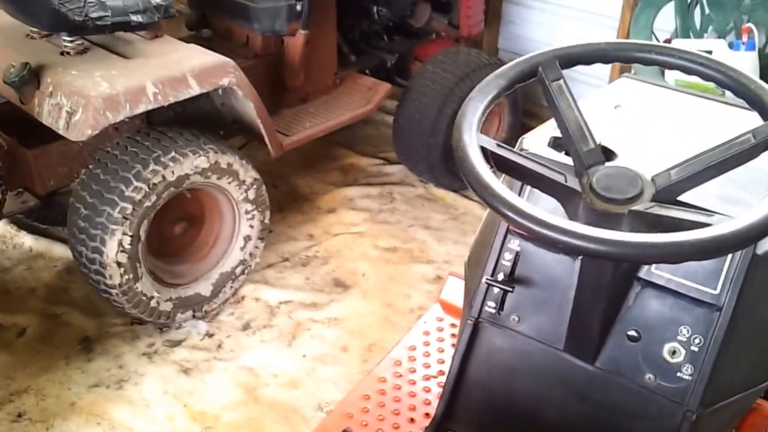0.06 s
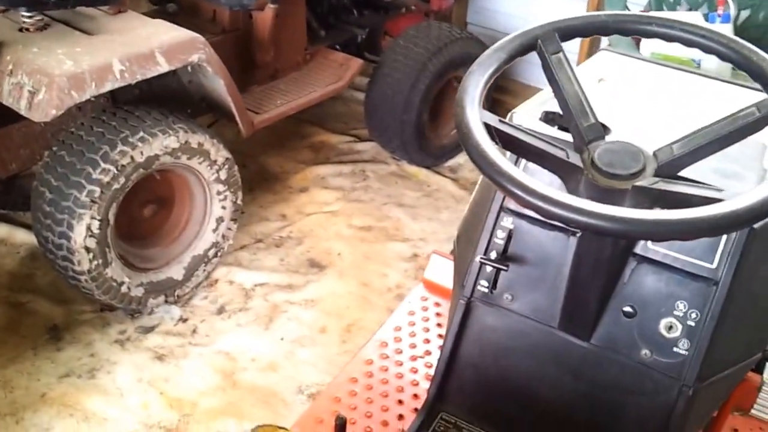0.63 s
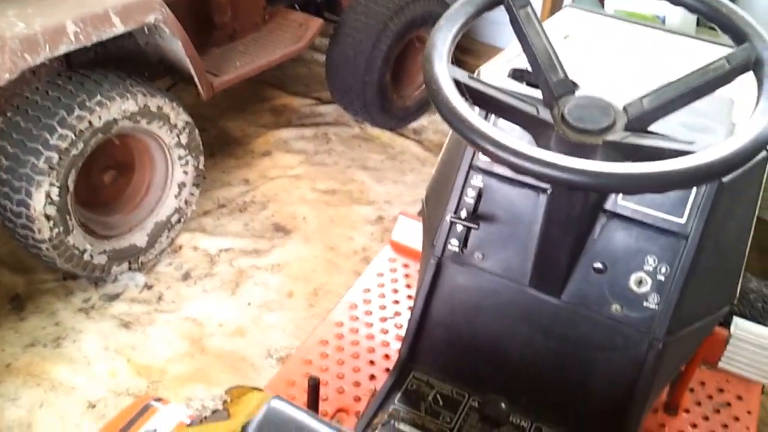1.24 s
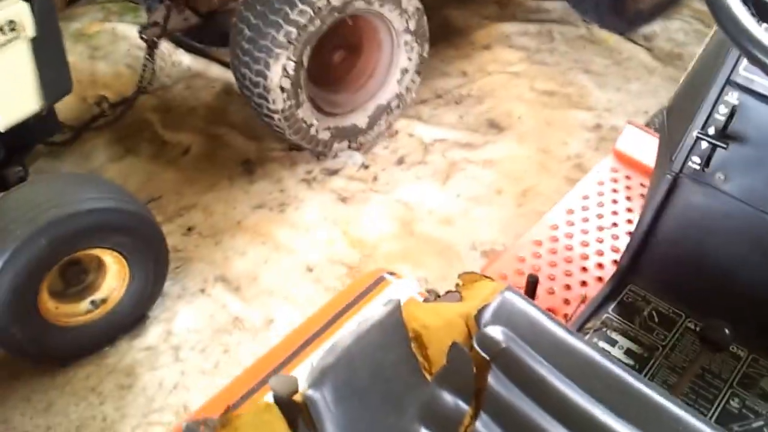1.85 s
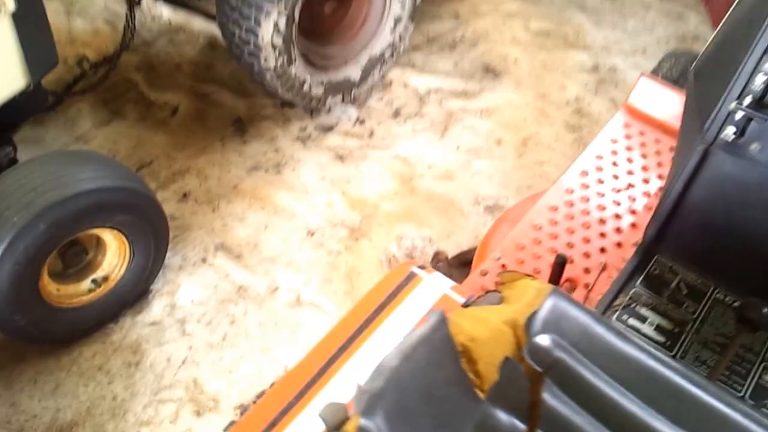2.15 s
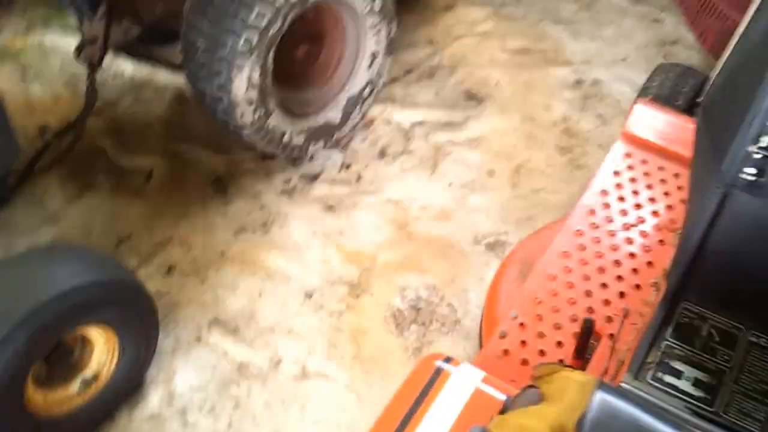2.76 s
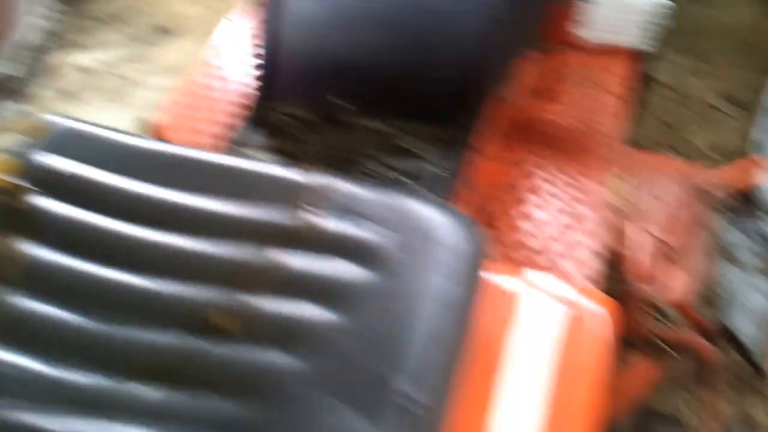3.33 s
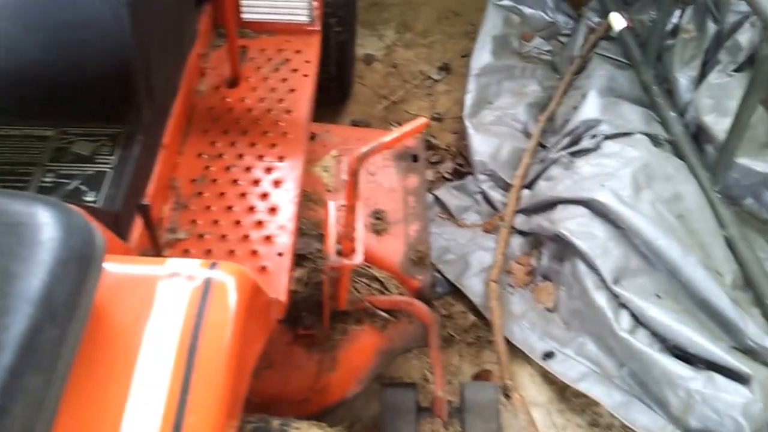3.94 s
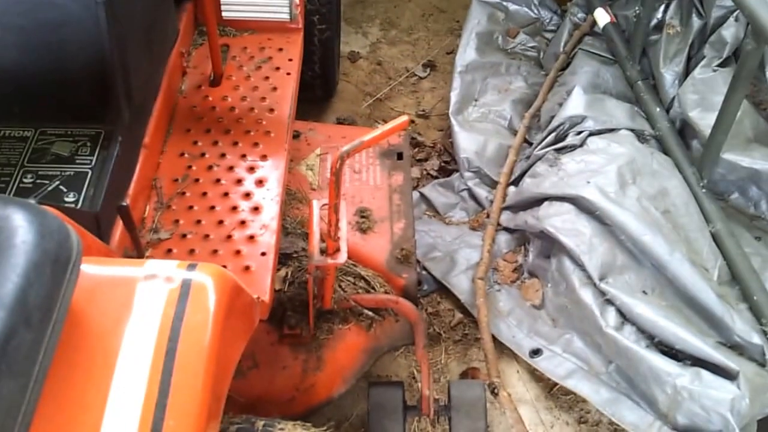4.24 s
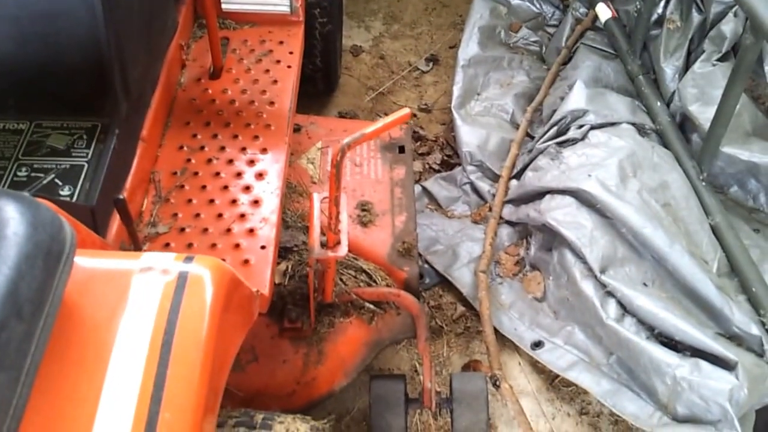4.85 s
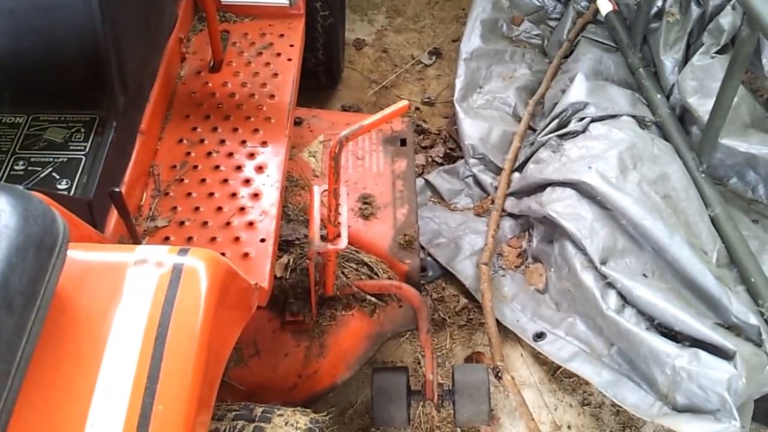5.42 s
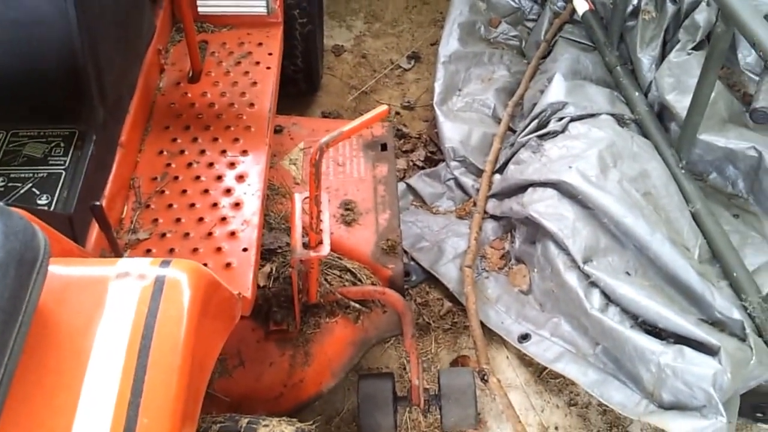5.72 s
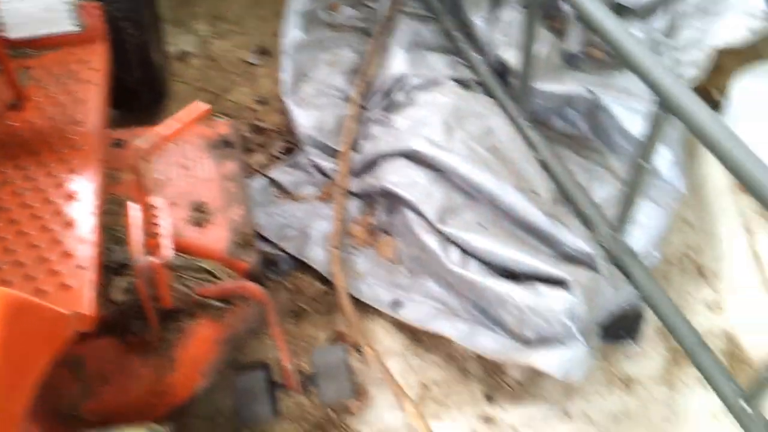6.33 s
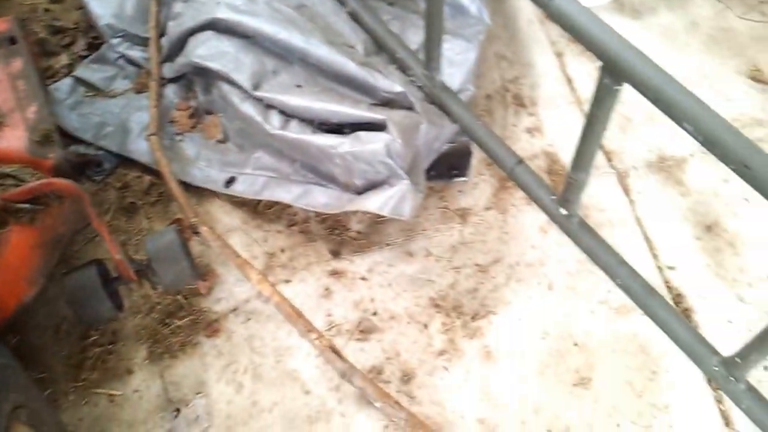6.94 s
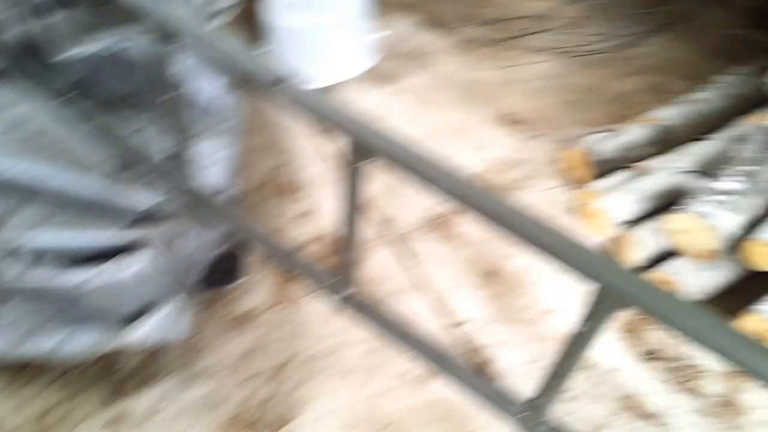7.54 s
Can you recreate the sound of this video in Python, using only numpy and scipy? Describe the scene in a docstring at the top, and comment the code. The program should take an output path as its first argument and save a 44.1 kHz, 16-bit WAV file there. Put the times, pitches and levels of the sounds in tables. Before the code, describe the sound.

Young animals, probably baby raccoons, chitter softly in a cluttered shed over a steady hiss. Each burst is a fast train of tiny, squeaky hoots with faint scuffling, heard at 0.1-0.7 seconds, 1.3, 2.6-3.4 and 4-4.9, then almost continuously and slightly louder from 6 seconds on; a weaker animal sometimes overlaps. Further off, a bird gives high, slurred, slightly echoing chirps in the first second, around 2-2.6 and 5.5-6.4, with held whistles breaking into hoarse falls near 3, 5, 6.2 and 6.9 seconds. Close finger bumps and clicks on the hand-held microphone stand out at about 1.6-1.8 and 2.9-3.1 seconds. Two sharp, bright ticks ring briefly in the shed at 5.9 and 6 seconds. Soft rustles come and go, mostly in the later part. The loudest sound is a handling thump with a click at about 7.6 seconds.

```python
"""In a cluttered shed young animals, probably raccoon kits, chitter: trains of short hoots, about 22 a
second, each a push of air whose pitch and level follow the effort. Further off a bird whistles slurred,
frequency-modulated phrases. Two sharp ticks excite the shed's reverberation, among soft rustles.
Fingers bump and click on the hand-held mono recorder, exciting its case modes, over a steady hiss."""
import sys
import numpy as np
from scipy import signal
from scipy.fft import rfft, irfft, next_fast_len
from scipy.io import wavfile

SR = 44100
rng = np.random.default_rng(int(sys.argv[2]) if len(sys.argv) > 2 else 0)


def store_pcm(level_fs):
    """Save levels as 16-bit WAV."""
    pcm = np.round(np.clip(level_fs, -1, 1) * 32767).astype(np.int16)
    wavfile.write(sys.argv[1], SR, np.atleast_2d(pcm).T)


N = 338688

# Trains of hoots, each swelling to a crest of effort and easing off: (first hoot [s], last hoot [s],
# rate [1/s], crest position [0-1], crest pitch [Hz], pitch sag at least effort [share],
# relative crest level [dB], fade at least effort [dB], overtone shift [dB], hiss [dB], scuffle [dB])
TRAINS = [(.125, .212, 22, 0, 695, .07, -46, 1, 0, -64, -62),
          (.283, .662, 24, .3, 768, .1, -41.5, 7, 0, -52, -56),
          (1.267, 1.465, 20, 1, 808, .06, -37.5, 3, 4, -55, -58),
          (2.565, 2.985, 19, .33, 900, .22, -37, 5, -2, -56, -54),
          (3.308, 3.422, 17, .2, 725, .05, -43, 0, -4, -66, -59),
          (4.024, 4.905, 23, .36, 820, .11, -38.5, 3, -1, -54, -58),
          (5.167, 5.167, 22, 0, 675, 0, -46, 0, -2, -70, -68),
          (5.98, 6.172, 21, .45, 815, .09, -35.5, 2, -2, -62, -66),
          (6.215, 6.6, 23.4, 1, 858, .08, -37, 1, -1, -53, -61),
          (6.64, 6.94, 23.4, 1, 965, .02, -37.5, 1, -2, -51, -57),
          (6.98, 7.39, 22, .4, 825, .08, -37.5, 5, 0, -57, -62),
          (7.428, 7.629, 20, .4, 805, .05, -36.5, 3, 0, -60, -60)]


def kits():
    """Vocal effort sets both pitch and level of each hoot; a weaker voice chitters along out of step."""
    # Bouts of the weaker voice: (start [s], end [s], pitch [Hz], level [dB])
    weak_bouts = [(.3, 0.661, 686, -50.5), (4.02, 4.924, 668.5, -48), (4.25, 4.66, 846, -49.5),
                  (6.03, 6.754, 742.5, -49), (6.64, 7.003, 838, -42.5), (7.03, 7.65, 706, -49)]
    lead_db, duty, weak_period_s = -1.24, .8, .045  # duty: the share of its beat that a hoot fills
    out = np.zeros(N)
    for first, last, rate, crest, crest_hz, sag, crest_db, fade_db, overtone_db, _, _ in TRAINS:
        times = np.linspace(first, last, int(round((last - first) * rate)) + 1)
        progress = np.linspace(0, 1, len(times))
        slack = ((progress - crest) / max(crest, 1 - crest)) ** 2  # 0 at the crest, 1 at least effort
        scatter = np.sqrt(3) * rng.uniform(-1, 1, (len(times), 4))  # unit variance
        for s, ease, (stretch, detune, force, lag) in zip(times, slack, scatter):
            length = duty * (1 + .12 * stretch) / rate
            hz = crest_hz * (1 - sag * ease + .016 * detune)
            db = lead_db + crest_db - fade_db * ease + 1.4 * force
            lead = hoot(hz, length, arch=.073, rough=.048,
                        second_db=overtone_db - 16, third_db=overtone_db - 12, rasp_db=-20.5)
            add(out, s - length / 2 + .0015 * lag, undb(db) * lead)
    for start, end, hz, db in weak_bouts:
        times = np.arange(start, end, weak_period_s)
        for s, (lag, detune, force) in zip(times, rng.standard_normal((len(times), 3))):
            weak = hoot(hz * (1 + .03 * detune), length=.042, arch=.057, rough=.04,
                        second_db=-17, third_db=-18.5, rasp_db=-18)
            add(out, s - len(weak) / SR / 2 + .004 * lag, undb(db + .76 * force) * weak)
    return room(out, t60=.26, wet_db=-4.5, build_s=.008)


def hoot(hz, length, arch, rough, second_db, third_db, rasp_db):
    """A harmonic tone whose fundamental arches with the push of air; rasp pulses once per cycle."""
    t = clock(length)
    u = t / length
    jitter = rough * noise(130, 120, len(t))
    pitch = hz * (1 + arch * (1 / 20 - (2 * u - 1) ** 2) + jitter)
    phase = 2 * np.pi * np.cumsum(pitch) / SR
    # each hoot has its own share of overtones
    second, third = undb(np.array([second_db, third_db]) + 2.4 * rng.standard_normal(2))
    tone = np.sin(phase) + second * np.sin(2 * phase) + third * np.sin(3 * phase)
    rasp = noise(2800, 590, len(t)) * (1 + np.sin(phase))
    return (np.sqrt(2) * tone + undb(rasp_db) * rasp) * swell(u, .53)


def stirring():
    """The kits stir as they call: two noise bands, amplitude-modulated together, swell with each train."""
    margin_s = .06  # before and after the train
    out = np.zeros(N)
    for first, last, *_, hiss_db, scuffle_db in TRAINS:
        t = clock(last - first + 2 * margin_s)
        grain = unit(undb(2.1 * noise(54, 90, len(t))))
        hiss = undb(hiss_db) * noise(1500, 1300, len(t)) * swell(t / t[-1], .35)
        scuffle = undb(scuffle_db) * noise(290, 240, len(t)) * swell(t / t[-1], .43)
        add(out, first - margin_s, (hiss + scuffle) * grain)
    return out


def bird():
    """Long calls and short chirps, smeared by a reverberant field about as strong as the direct sound."""
    # Held whistles that break into a hoarse fall:
    # (time [s], hold [s], pitch [Hz], hold level [dB], fall level [dB])
    calls = [(2.954, 0.12, 3081, -46, -50.5), (4.992, .115, 3158, -43, -49),
             (6.178, 0.048, 2853, -33.5, -51.5), (6.853, 0.13, 2985, -38.5, -44.5)]
    # Slurred notes: (time [s], length [s], pitch [Hz], glide [share], level [dB], warble scale [Hz])
    chirps = [(0.0, 0.17, 2652, -.13, -51, 10), (0.187, .15, 2888, 0.13, -41, 59),
              (0.32, 0.12, 2340, -0.045, -46, 12), (.738, 0.032, 2400, 0.19, -48, 25),
              (0.76, 0.043, 2430, -.13, -40.5, 20), (0.803, 0.0786, 2420, 0.034, -41, 58),
              (0.971, 0.059, 2410, 0.13, -47.5, 40), (.991, 0.067, 2793, 0.014, -43, 9),
              (1.991, .11, 2490, -0.15, -56, 10), (2.074, 0.088, 1860, -0.211, -59, 9),
              (2.278, 0.1, 2506, 0.058, -47.5, 230), (2.372, 0.078, 2476, .02, -51.5, 25),
              (2.499, .056, 2767, 0.063, -46.5, 74), (2.596, .11, 2596, -0.054, -51, 130),
              (4.946, 0.078, 2640, -.04, -59, 7), (5.555, 0.06, 2489, -0.007, -43, 12),
              (5.613, .05, 2802, 0.043, -41, 70), (5.631, 0.045, 2468, -0.16, -41.5, 170),
              (5.687, 0.15, 2310, -0.18, -52, 30), (5.811, 0.057, 2260, 0.086, -45, 770),
              (5.835, 0.23, 3390, 0.15, -50, 8), (6.145, 0.15, 6640, -.035, -52, 12),
              (6.221, 0.035, 2430, -0.22, -42, 35), (6.288, 0.0304, 2680, -0.14, -39, 27),
              (6.414, 0.064, 2303, 0.054, -40.5, 100), (6.844, 0.06, 3750, .02, -54.5, 130)]
    out = np.zeros(N)
    for s, hold, hz, db, fall_db in calls:
        held = slur(hold, hz, glide=.031, bow_hz=.018 * hz, warble_hz=10, edge=.13)
        fall = slur(length=.073, hz=.92 * hz, glide=-.188, bow_hz=54, warble_hz=190, edge=.2)
        add(out, s, undb(db) * held)
        add(out, s + 1.3 * hold, undb(fall_db) * fall)
    for s, length, hz, glide, db, warble_hz in chirps:
        add(out, s, undb(db) * slur(length, hz, glide, bow_hz=54, warble_hz=warble_hz, edge=.13))
    return room(out, t60=.49, wet_db=.5, build_s=.0018)


def slur(length, hz, glide, bow_hz, warble_hz, edge):
    """Frequency modulation: a whistle glides along an arch with a fast warble, over a hoarse undertone."""
    hoarse_db, hoarse_ratio, hoarse_warble_hz = -15.5, .93, 258
    t = clock(length)
    u = t / length
    pitch = hz * (1 + glide * (u - .5)) - bow_hz * (2 * u - 1) ** 2
    warble = .7 * warble_hz * noise(150, 90, len(t))
    rasp = hoarse_warble_hz * noise(250, 150, len(t))
    wander = 14 * noise(40, 40, len(t))
    whistle = np.sin(2 * np.pi * np.cumsum(pitch + warble + wander) / SR)
    hoarse = np.sin(2 * np.pi * np.cumsum(hoarse_ratio * pitch + rasp) / SR)
    force_db = 1.5 * noise(60, 50, len(t))
    return undb(force_db) * np.sqrt(2) * (whistle + undb(hoarse_db) * hoarse) * swell(u, edge)


def ticks():
    """Exponentially decaying transients: a bright burst, fronted by a lower crack, rings in the shed."""
    # Sharp ticks across the shed:
    # (time [s], level [dB], decay constant [s], centre [Hz], bandwidth [Hz], relative crack level [dB])
    bursts = [(5.867, -18, 0.014, 5220, 1290, -2), (6.036, -23.5, 0.022, 4700, 1500, 6)]
    out, t = np.zeros(N), clock(.15)
    attack = 1 - np.exp(-t / .0037)
    for s, db, decay, centre_hz, width_hz, crack_db in bursts:
        bright = noise(centre_hz, width_hz / 2, len(t)) * np.exp(-t / decay)
        crack = (noise(3400, 250, len(t)) + .58 * noise(1300, 1500, len(t))) * np.exp(-t / .007)
        add(out, s, undb(db) * (bright + undb(crack_db) * crack) * attack)
    return room(out, t60=.24, wet_db=-3.5, build_s=.0046)


def rustles():
    """Friction noise: soft swells of scuffing, made grainy by random amplitude modulation."""
    # Rustles and rubs: (time [s], length [s], level [dB], centre [Hz], bandwidth [Hz])
    rubs = [(1.625, 0.072, -45, 135, 130), (2.36, .5, -54.5, 303, 400), (2.817, 0.041, -43.5, 130, 400),
            (2.97, 0.058, -40, 237, 700), (4.981, 0.12, -52, 3900, 1200), (5.348, 0.1, -50.5, 4400, 1400),
            (5.628, 0.072, -50.5, 4400, 1400), (6.709, 0.07, -48.5, 340, 400),
            (7.22, 0.18, -45, 3700, 1800), (7.492, 0.066, -44, 2500, 6000), (7.553, 0.027, -34, 900, 3000)]
    out = np.zeros(N)
    for s, length, db, centre_hz, width_hz in rubs:
        t = clock(length)
        grain = unit(undb(2 * noise(120, 170, len(t))))
        scuff = noise(centre_hz, width_hz / 2, len(t)) * grain
        add(out, s, undb(db) * scuff * swell(t / length, .19))
    return out


def handling():
    """Structure-borne sound: a bump gives a heavily damped thump, a modal ring and a sharp edge."""
    # Fingers on the recorder: (time [s], thump [dB], thump frequency [Hz], ring gain [dB], edge [dB])
    bumps = [(1.2858, -40, 900, -2.5, -31), (1.6302, -21, 308, -54, -26), (1.6446, -23.5, 332, -42, -44),
             (1.6526, -32, 513, -22.5, -12.5), (1.6662, -25, 417, -28, -41),
             (1.7623, -27.5, 337, -48, -21.5), (1.9865, -50, 600, -46, -37), (2.199, -50, 600, -42, -35),
             (2.8875, -16, 360, -55, -42), (2.962, -25, 342, -32, -44), (2.987, -22.5, 252, -25.5, -47),
             (3.0575, -11, 370, -34, -20), (5.705, -33.5, 900, -31, -42), (5.964, -27.5, 480, -43, -39),
             (6.338, -36, 504, -32, -33), (6.833, -29.5, 342, -42, -47), (7.421, -37, 394, -48, -37),
             (7.567, -16, 400, -41, -6.5), (7.5701, -17, 400, -40, -18), (7.5733, -20, 454, -14, -38),
             (7.577, -5.5, 250, -27, -5)]
    # Modes of the plastic case: (frequency [Hz], 60 dB decay time [s], relative level [dB])
    case_modes = [(665, 0.0098, -18), (1085, 0.0062, -4), (2240, 0.0065, -6.5), (2966, 0.0027, 11),
                  (3670, 0.0025, 7), (6520, 0.0086, -20.5)]
    out, t = np.zeros(N), clock(.03)
    ring = sum(undb(db) * np.sin(2 * np.pi * hz * t) * np.exp(-np.log(1000) * t / t60)
               for hz, t60, db in case_modes)
    attack = 1 - np.exp(-t / .00044)
    ring = signal.sosfilt(signal.butter(2, 450, "highpass", fs=SR, output="sos"), ring * attack)
    edge = np.exp(-t / .0001)
    for s, thump_db, thump_hz, ring_db, edge_db in bumps:
        cycles = thump_hz * t
        pulse = np.sin(2 * np.pi * cycles) * cycles * np.exp(-cycles / .23)
        thump = np.gradient(pulse, cycles)
        add(out, s, undb(thump_db) * thump + undb(ring_db) * ring + undb(edge_db) * edge)
    return out


def background():
    """Stationary noise: a broadband hiss over a faint, deep, narrow-band drone."""
    # Hiss spectrum ahead of the bass shelf: (frequency [Hz], relative spectral density [dB])
    spectrum = [(15, -41), (25, -11), (108, -12), (174, -2.5), (267, -5.5), (339, -1.5), (474, -3.5),
                (662, -1), (747, -4.5), (822, 1), (1020, -4.5), (1490, -6.5), (2240, -6), (5700, -4.5),
                (7600, -16), (9880, -66), (16700, -120)]
    hiss_db, shelf_db, drone_db = -50, -1.5, -78
    f = np.fft.rfftfreq(N, 1 / SR) + 1
    hz, db = np.transpose(spectrum)
    gain = undb(np.interp(np.log(f), np.log(hz), db))
    hiss = unit(irfft(rfft(rng.standard_normal(N)) * gain, N))
    bass = signal.sosfiltfilt(signal.butter(2, 600, fs=SR, output="sos"), hiss)
    hiss += (undb(shelf_db) - 1) * bass
    drone_band = signal.butter(2, [56, 76], "bandpass", fs=SR, output="sos")
    drone = unit(signal.sosfilt(drone_band, rng.standard_normal(N)))
    return undb(hiss_db) * hiss + undb(drone_db) * drone


def room(x, t60, wet_db, build_s):
    """Reverberation: dense reflections off the clutter build up, then decay 60 dB in t60 seconds."""
    t = clock(1)
    tail = rng.standard_normal(SR) * np.exp(-np.log(1000) * t / t60) * (1 - np.exp(-t / build_s))
    return x + undb(wet_db) * signal.fftconvolve(x, tail / np.linalg.norm(tail))[:N]


def noise(centre_hz, half_width_hz, size):
    """White noise through a resonance applied twice; rms about one."""
    span = max(16384, next_fast_len(size))
    f = np.fft.rfftfreq(span, 1 / SR) + 1
    gain = 1 / (1 + ((f * f - centre_hz ** 2) / (f * half_width_hz * 2)) ** 2)
    return unit(irfft(rfft(rng.standard_normal(span)) * gain, span))[:size]


def swell(u, edge):
    """Raised-cosine envelope over 0-1; attack and release each take the share edge."""
    return np.sin(np.pi / 2 * np.clip(np.minimum(u, 1 - u) / edge, 0, 1)) ** 2


def undb(db):
    """Decibels to amplitude ratio."""
    return 10 ** (np.asarray(db) / 20)


def unit(x):
    """Scale to an rms of one."""
    return x / np.sqrt(np.mean(x ** 2))


def clock(length):
    """Sample times over a length in seconds."""
    return np.arange(int(length * SR)) / SR


def add(track, start, sound):
    """Superpose a sound on a track at a time in seconds."""
    i = int(round(start * SR))
    part = sound[max(-i, 0):max(N - i, 0)]
    track[max(i, 0):max(i, 0) + len(part)] += part


def scene():
    """Superposition: all sources sum at one microphone, which feeds both channels."""
    mono = kits() + stirring() + bird() + ticks() + rustles() + handling() + background()
    return np.array([mono, mono])


def record(dry):
    """Band limiting in the recorder: no deep bass; the treble rolls off, then is cut."""
    bass_hz, rolloff_hz, top_hz = 45, 6900, 7750
    thin = signal.sosfilt(signal.butter(2, bass_hz, "highpass", fs=SR, output="sos"), dry)
    soft = signal.sosfilt(signal.butter(6, rolloff_hz, fs=SR, output="sos"), thin)
    return signal.sosfilt(signal.ellip(8, .2, 70, top_hz, fs=SR, output="sos"), soft)


dry = scene()
out = record(dry)
store_pcm(out)
```